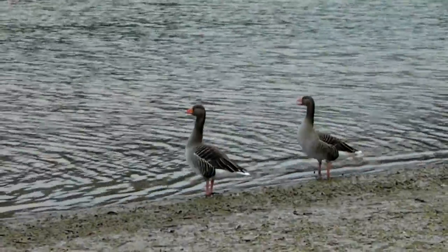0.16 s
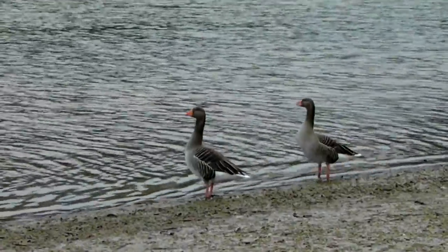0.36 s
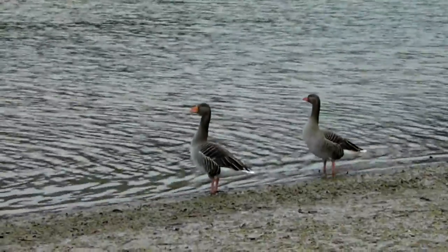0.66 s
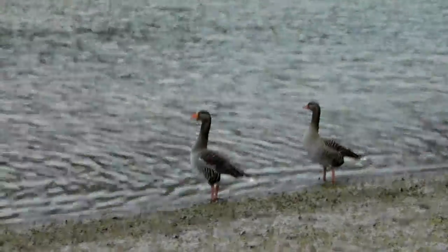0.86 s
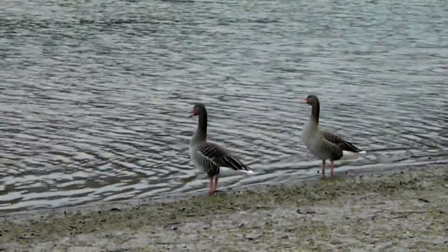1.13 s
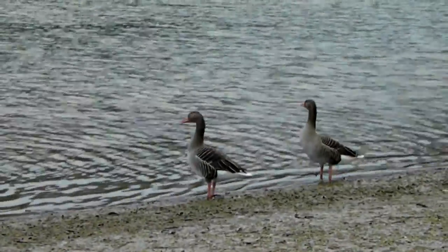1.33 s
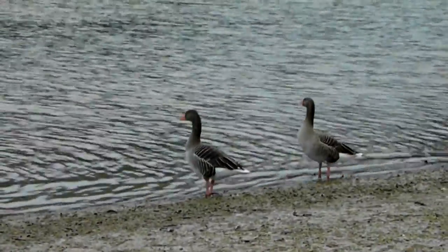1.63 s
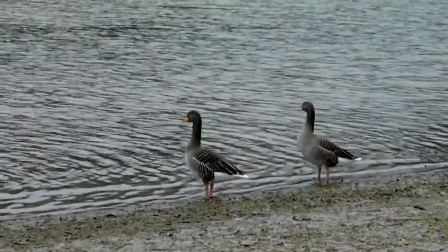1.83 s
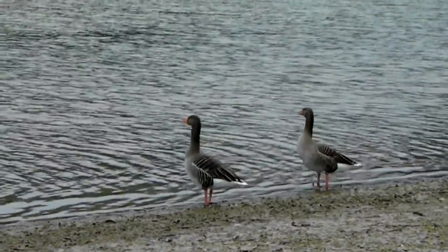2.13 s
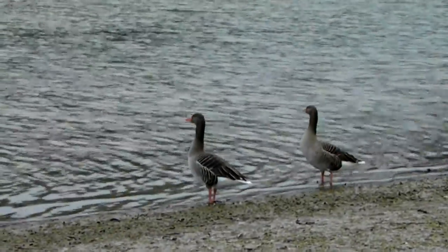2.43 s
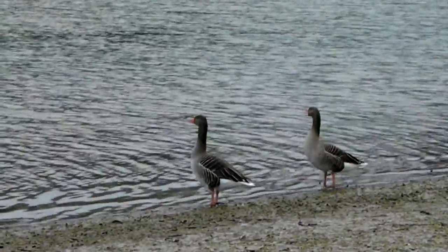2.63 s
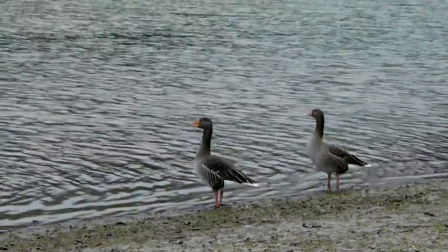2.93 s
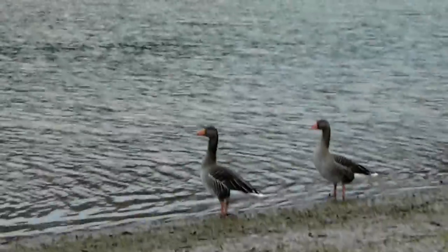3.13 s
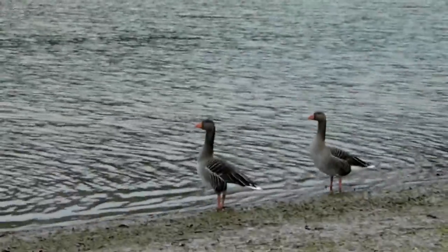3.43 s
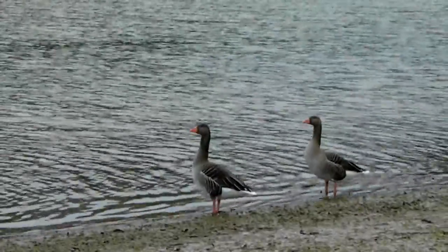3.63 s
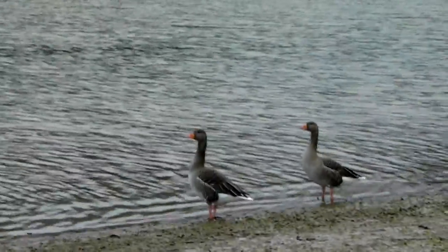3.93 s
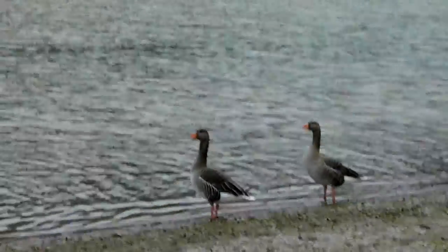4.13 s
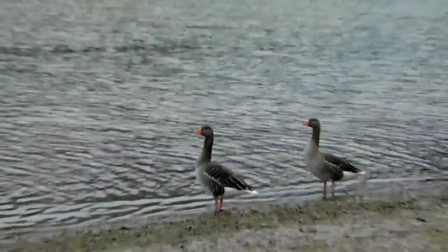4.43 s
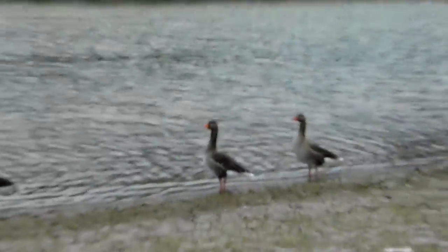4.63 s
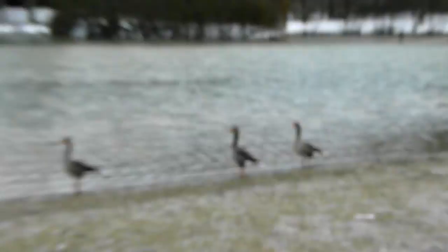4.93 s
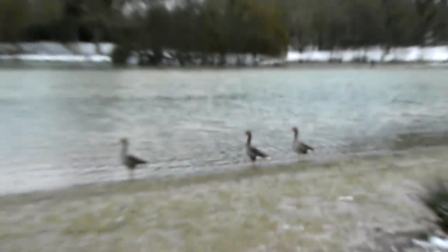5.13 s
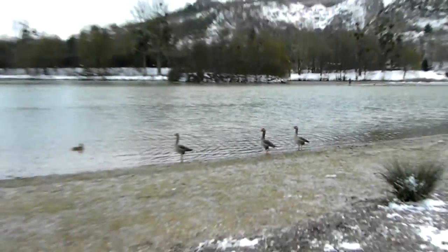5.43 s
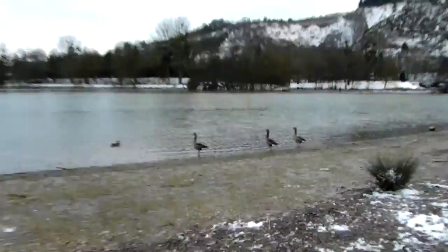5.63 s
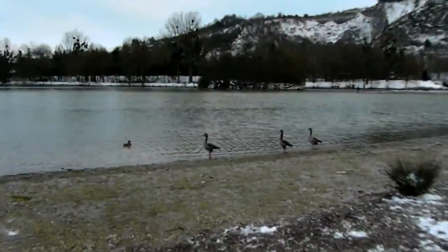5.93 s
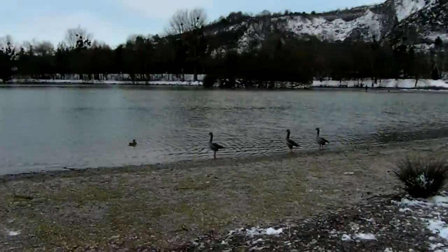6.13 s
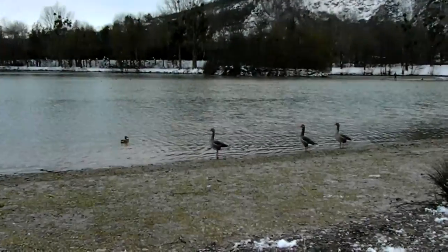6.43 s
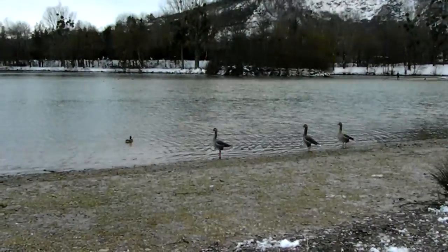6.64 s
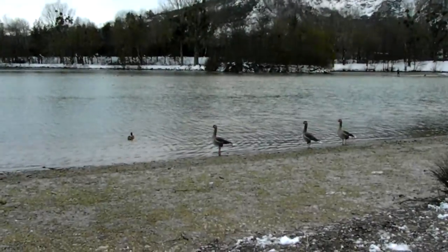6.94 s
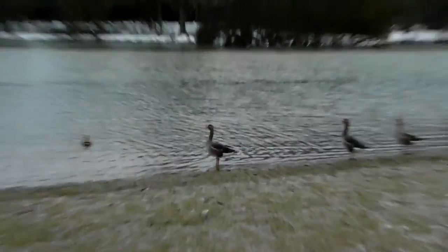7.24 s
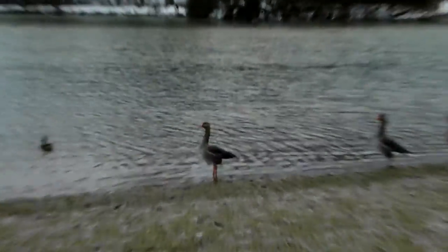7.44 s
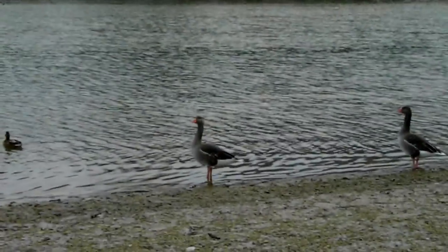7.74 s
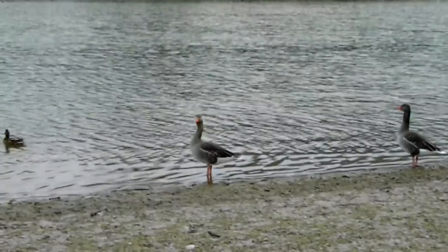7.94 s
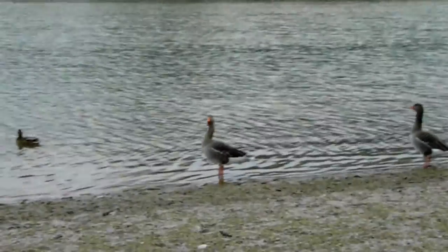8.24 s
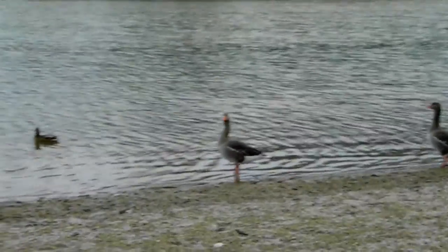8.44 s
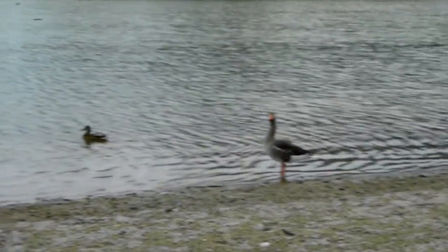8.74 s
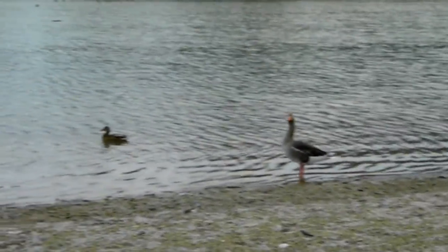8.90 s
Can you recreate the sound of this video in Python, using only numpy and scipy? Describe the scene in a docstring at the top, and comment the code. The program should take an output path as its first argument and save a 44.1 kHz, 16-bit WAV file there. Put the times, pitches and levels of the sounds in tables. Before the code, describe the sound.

Over the soft, steady wash of lake ripples, nearby geese give short, ringing honks with rough edges, mixed at first with rattling grunts. A cluster of sharp clicks comes early and others are scattered throughout. Midway the honks come in a quick run as the camera's zoom motor starts to hiss in spurts close to the microphone. Faint far bird calls and two gull cries follow, then more honks and small lens ticks.

```python
"""Greylag geese honk close by on a lake shore while ripples wash the bank.
A goose's voice box (the syrinx) sings through its throat: each honk starts with a rasp, clears into
a ringing tone and frays again. In between, slower slaps of the voice box make low rattling grunts.
Sharp clicks sound nearby, far birds and a gull call, and the lens motor of a hand-held camera
whirrs, hisses and ticks as it focuses and zooms."""
import sys
import numpy as np
from scipy import signal
from scipy.fft import rfft, irfft
from scipy.io import wavfile
from scipy.ndimage import uniform_filter1d, minimum_filter1d, map_coordinates

SR = 44100
rng = np.random.default_rng(int(sys.argv[2]) if len(sys.argv) > 2 else 0)


def inscribe(sig):
    """Save sig as 16-bit PCM at rate SR to the path in sys.argv[1].

    A 1-D sig is mono; a 2-D sig holds one channel per row.
    Samples are clipped to [-1, 1] before scaling.
    """
    pcm = np.round(np.clip(np.atleast_2d(sig).T, -1, 1) * 32767)
    wavfile.write(sys.argv[1], SR, pcm.astype(np.int16))


N = 399987
TIME = np.arange(N) / SR

# One row a honk. Clear, crest, crack and fray count from its start; a crack of 0 means none.
# (start [s], tone clears [s], pitch crests [s], voice cracks [s], tone frays [s], length [s],
#  crest pitch [Hz], sag [share of crest pitch per s], level [dB], fade by the end [dB],
#  overtones at 4-6.5 kHz [dB relative to level], sheen above them [dB relative to level],
#  flutter [Hz], roughness left in the clear tone [0-1], upper throat resonance [dB])
HONKS = [(-0.1, 0.02, 0.038, 0.0, 0.11, 0.13, 860.0, 1.8, -22.0, 18.0, -7.0, -26.0, 190.0, 0.38, -3.0),
         (0.245, 0.037, 0.051, 0.076, 0.13, 0.19, 888.0, 1.97, -12.2, 26.0, -13.0, -27.0, 180.0, 0.27, -8.0),
         (0.611, 0.022, 0.039, 0.0, 0.089, 0.14, 859.0, 1.73, -12.9, 20.0, -8.0, -27.0, 170.0, 0.069, -1.0),
         (1.063, 0.019, 0.054, 0.082, 0.134, 0.19, 881.0, 1.93, -11.7, 25.0, -13.0, -26.0, 190.0, 0.021, -2.0),
         (1.224, 0.036, 0.054, 0.0, 0.122, 0.146, 601.0, 1.1, -18.0, 17.0, -10.5, -21.0, 290.0, 0.1, -10.0),
         (1.773, 0.018, 0.035, 0.075, 0.047, 0.11, 890.0, 1.3, -16.5, 8.0, -8.0, -20.0, 250.0, 0.35, -4.0),
         (1.85, 0.032, 0.046, 0.0, 0.092, 0.15, 840.0, 1.5, -18.9, 18.0, -4.0, -24.0, 190.0, 0.08, -4.0),
         (2.625, 0.029, 0.05, 0.081, 0.124, 0.17, 888.0, 2.18, -14.3, 22.0, -11.0, -26.0, 170.0, 0.036, -7.0),
         (2.91, 0.022, 0.053, 0.0, 0.098, 0.12, 861.0, 2.24, -13.9, 10.0, -12.0, -29.0, 180.0, 0.11, 0.0),
         (4.058, 0.028, 0.055, 0.071, 0.122, 0.17, 889.0, 2.47, -11.5, 18.0, -10.0, -20.0, 180.0, 0.09, -7.0),
         (4.677, 0.026, 0.046, 0.0, 0.08, 0.11, 846.0, 3.08, -14.4, 19.0, -10.0, -27.0, 190.0, 0.05, -2.0),
         (4.905, 0.015, 0.072, 0.069, 0.064, 0.18, 914.0, 2.45, -13.5, 14.0, -8.0, -17.0, 170.0, 0.18, -5.0),
         (5.198, 0.03, 0.073, 0.0, 0.129, 0.16, 889.0, 2, -12.6, 16.0, -7.0, -26.0, 180.0, 0.033, -6.0),
         (5.55, 0.025, 0.057, 0.085, 0.145, 0.2, 891.0, 1.78, -10.0, 21.0, -13.0, -22.0, 200.0, 0.024, -6.0),
         (6.719, 0.025, 0.053, 0.068, 0.11, 0.16, 882.0, 2.7, -11.3, 22.0, -14.0, -29.0, 195.0, 0.03, -11.0),
         (6.965, 0.028, 0.069, 0.0, 0.12, 0.14, 876.0, 2.33, -13.4, 10.0, -10.0, -31.0, 190.0, 0.028, -5.0),
         (7.276, 0.016, 0.062, 0.082, 0.141, 0.19, 904.0, 2.1, -12.7, 14.0, -13.0, -13.0, 180.0, 0.2, -4.0),
         (7.558, 0.026, 0.057, 0.0, 0.129, 0.15, 609.0, 1.1, -13.4, 21.0, -4.0, -15.0, 200.0, 0.06, -7.0),
         (8.588, 0.033, 0.049, 0.07, 0.117, 0.17, 886.0, 2.44, -11.6, 21.0, -15.0, -26.0, 185.0, 0.075, -10.0),
         (8.808, 0.04, 0.073, 0.0, 0.137, 0.18, 874.0, 1.84, -15.2, 19.0, -10.0, -34.0, 190.0, 0.03, -9.0)]
# The tone colours of a honk, each (frequency [Hz], level [dB]):
OPEN_THROAT = [(600, -20.5), (850, -16.5), (1200, -17.5), (1750, -15.5), (2400, -1), (2650, 0),
               (3000, -16.5), (3400, 0.5), (3700, -5.5)]  # with the bill open
LOCKED_THROAT = [(850, -17), (1750, -18.5), (2600, -22), (3100, -11.5), (3500, 0.5), (3700, -3)]  # while the voice locks on the upper resonance
OVERTONE_COLOUR = [(3950, -12), (4200, -1.5), (4400, 0.5), (5300, -2), (6100, -23), (7050, -12),
                   (7800, -17.5), (8700, -14), (9800, -32), (11500, -45), (16000, -53)]  # the high harmonics
RASP_COLOUR = [(300, -32.5), (700, -12), (1100, -2.5), (1400, -26.5), (2100, 6.5), (2550, -4.5),
               (3000, -20.5), (3500, 1), (4000, -15), (4800, -0.5), (6200, -19.5), (8800, -22.5),
               (10800, -39.5), (15000, -47.5)]  # the breathy noise
# Lapping water and the low rumble under it, each (frequency [Hz], level [dB])
RIPPLE_COLOUR = [(140, -51.5), (230, -18), (280, -12.5), (520, -5.5), (621, -4.5), (886, -2), (986, -3),
                 (1560, -6), (2810, -13.5), (3940, -10), (4870, -20.5), (5710, -27.5), (6820, -30.5),
                 (16000, -37)]
RUMBLE_COLOUR = [(20, -26), (38, -16), (60, 1), (80, -7.5), (125, -7), (160, -13), (200, -22.5), (400, -48)]
# Nearby clicks and knocks: (time [s], level [dB], extra thud under 800 Hz [dB],
#  extra body under 2.5 kHz [dB], extra treble over 6 kHz [dB])
CLICKS = [(0.205, -31, 0, -5, -15), (2.565, -14.5, -4, -10, -2), (2.583, -17, -4, -11, -1),
          (2.592, -15.5, -4, -15, -3), (2.601, -21.5, -4, -5, -4), (2.757, -26, -4, -5, -1),
          (3.2, -37.5, 0, -1, -14), (3.215, -33, 0, -12, -10), (3.554, -28.5, -4, 6, -6),
          (3.963, -27, 3, 4, 2), (4.375, -29, 0, -5, -8), (4.467, -22, 5, 1, -9), (4.478, -20, 7.5, 5, -13),
          (5.955, -24, 6, 0, -10), (5.999, -25, 0, -8, -2), (6.568, -22, -2, 2.5, 9),
          (6.71, -30, 0, -5, -2), (7.559, -18, 0, -2, 17), (8.453, -29, 0, -8, -9),
          (8.46, -29.5, 0, -10, -3), (8.497, -36, 0, -8, -3)]
CLICK_COLOUR = [(150, -27.5), (280, -2.5), (600, -4), (1300, 5.5), (2500, 2), (3500, 3.5), (5500, -3),
                (9000, -18), (15000, -31)]  # a hard contact: (frequency [Hz], level [dB])
# Notes from the voice box's other side: (start [s], end [s], pitch [Hz], level [dB], flutter [Hz])
SECOND_VOICE = [(.25, .33, 1016, -29.5, 195), (1.78, 1.83, 1022, -27, 200), (1.81, 1.925, 1156, -23.5, 273),
                (4.962, 5.04, 1102, -24.5, 174), (7.31, 7.395, 1040, -36, 202)]
SECOND_THROAT = [(1100, -9.5), (2200, 0), (3300, -18.5), (4500, -8), (5600, -17)]  # their tone colour: (frequency [Hz], level [dB])
# Rattling grunts: (start [s], length [s], level [dB], depth of the swell [dB])
GRUNTS = [(.742, .128, -21, 11.5), (1.364, .19, -18, 17), (2.118, .18, -16.5, 22), (2.963, .108, -20, 1.5),
          (3.606, .165, -17, 18)]
GRUNT_THROAT = [(200, -44), (340, -25.5), (480, -33), (1000, -23), (1500, -12), (1900, 0), (2350, -8),
                (3000, -27), (4250, -17), (5000, -31), (6200, -34.5), (7100, -30.5), (9000, -43),
                (12000, -60), (16000, -68)]  # the throat once open: (frequency [Hz], level [dB])
# Thin calls of far birds: (start [s], end [s], top pitch [Hz], level [dB])
FAR_CALLS = [(2.043, 2.105, 3780, -65), (2.296, 2.417, 3800, -62), (7.027, 7.172, 1154, -41),
             (7.2, 7.33, 1160, -40.5), (7.379, 7.507, 1125, -42.5), (7.498, 7.6, 1134, -43)]
# How loud the focus motor is over time: (time [s], level [dB])
FOCUS_LEVELS = [(3.25, -78), (3.5, -47.5), (3.74, -44), (3.8, -57.5), (7.6, -62.5), (7.7, -45.5),
                (7.95, -46.5), (8.1, -53), (8.16, -61)]
FOCUS_COLOUR = [(1000, -16), (2400, -10.5), (3500, 5.5), (4400, -4.5), (5500, 4.5), (7000, -12.5),
                (9500, -16.5), (15000, -34.5)]  # its whirr: (frequency [Hz], level [dB])
# Short jerks of the lens motor: (time [s], level [dB], ringing pitch [Hz])
JERKS = [(4.4134, -24, 3080), (5.9229, -24, 3044), (8.2246, -27, 3470), (8.3245, -24, 3520),
         (8.4252, -25, 3750), (8.7922, -30.5, 3340), (8.9967, -28.5, 3600)]
# Runs of the zoom motor: (start [s], end [s], level [dB])
ZOOMS = [(4.42, 4.5, -42), (4.49, 5.2, -36), (5.18, 5.785, -38), (5.915, 6.072, -36), (6.265, 6.44, -37),
         (6.98, 7.7, -35.5)]
ZOOM_COLOUR = [(280, -34), (500, -14), (1400, -16.5), (1700, -6.5), (2400, -5.5), (3020, 2.5), (3550, -4.5),
               (4300, -13.5), (6300, -8.5), (7500, -22), (8600, -20), (9800, -32.5), (13800, -34),
               (14900, -34), (16000, -47)]  # its hiss: (frequency [Hz], level [dB])
# Cries of a far gull: (start [s], end [s], pitch [Hz], level [dB], flutter [Hz])
GULL_CRIES = [(6.095, 6.18, 1175, -40, 140), (6.197, 6.29, 1185, -39.5, 135)]
GULL_THROAT = [(1150, -24), (2350, -8), (3500, 0), (4600, -3), (5800, -24)]  # their tone colour: (frequency [Hz], level [dB])
# The lens motor creeping step by step: (start [s], end [s], rate [steps per s], level [dB])
CREEPS = [(6.43, 6.65, 90, -42)]
LENS_RING = [(1500, -22), (2800, -6), (3150, -20), (3600, 9.5), (4000, -3), (4400, -3), (5100, -16),
             (6000, -31), (15000, -49)]  # how the lens rings at each step: (frequency [Hz], level [dB])


def gain_of(db):
    """Turns decibels into a number to multiply by."""
    return 10 ** (np.asarray(db) / 20)


def evened(x):
    """Scales a sound to an average strength (rms) of 1."""
    return x / np.sqrt(np.mean(x ** 2) + 1e-20)


def level_at(points, hz):
    """Looks up a tone colour's level in dB at any frequency."""
    f, db = np.transpose(points)
    return np.interp(np.log(hz + 1), np.log(f + 1), db)


def add(mix, start, sound):
    """Mixes a sound in at a start time in seconds."""
    at = round(start * SR)
    part = mix[max(at, 0):][:len(sound) + min(at, 0)]
    part += sound[max(-at, 0):][:len(part)]


def ramp(x, width):
    """A soft step from 0 to 1 where x passes zero."""
    return .5 + .5 * np.tanh(x / width)


def wander(t, hz):
    """A smooth random wobble, about 1 in size, with hz new values a second."""
    steps = (t - t[0]) * hz + 2
    return map_coordinates(rng.standard_normal(int(steps[-1]) + 5), [steps], order=3)


def colour(x, points, size=4096):
    """Gives x a tone colour, like a body that rings after it is struck."""
    cepstrum = irfft(np.log(gain_of(level_at(points, np.fft.rfftfreq(size, 1 / SR)))))
    # move all the ringing to after the strike
    cepstrum[1:size // 2] *= 2
    cepstrum[size // 2 + 1:] = 0
    return signal.oaconvolve(x, irfft(np.exp(rfft(cepstrum))))[:len(x)]


def noise(points, count=N):
    """Noise of strength 1 with the given tone colour."""
    return evened(colour(rng.standard_normal(count), points))


def phase_of(hz):
    """The running angle of a wave whose pitch changes."""
    return 2 * np.pi * np.cumsum(hz) / SR


def beats(rate):
    """Sample numbers at which a rate in Hz completes a cycle."""
    return np.flatnonzero(np.diff(np.floor(np.cumsum(rate) / SR)))


def puffs(hits, decay_s):
    """Follows each hit with a dying puff of noise."""
    return signal.lfilter([1], [1, -np.exp(-1 / (decay_s * SR))], hits) * rng.standard_normal(len(hits))


def breath(t, clear, crest, crack, length, crest_hz, sag_per_s, peak_db, fade_db, climb_per_s=1.9):
    """One breath drives a honk: gives its pitch, level, and dB shifts of overtones and sheen."""
    has_crack = float(crack > 0)
    # the pitch climbs to a rounded crest and sags; soon after a crack it rests on a shelf
    from_crest = np.hypot(t - crest, .023) - .023
    shelf = has_crack * .041 * ramp(t - crack - .0278, .013)
    hz = crest_hz * (1 - np.where(t < crest, climb_per_s, sag_per_s) * from_crest + shelf)
    # the breath swells until just after the tone clears, runs out ever faster, and stops
    opening = np.maximum(1 - t / (clear + .0092), 0) ** 1.49
    spent = (t / length) ** 2.7
    stopping = np.exp((t - length) / .0067)
    # a crack dents the level, flashes the overtones and leaves the voice weaker, then duller
    cracking = has_crack * np.exp(-((t - crack) / .009) ** 2)
    cracked = has_crack * ramp(t - crack, .006)
    dulled = has_crack * ramp(t - crack - .042, .012)
    level_db = peak_db - 17 * opening - fade_db * spent - 12.5 * stopping - 3.8 * cracking - 4 * cracked
    bright_db = 3.5 * opening + 6.5 * cracking - 5 * spent - 5 * dulled
    return hz, level_db, bright_db, -11 * spent


def honk(row, harmonics=19, rasp_db=-11, air_db=-30, chop=.6, bend=.18):
    """The voice box sings through the throat; a slower flutter chops the tone at both ends."""
    (start, clear, crest, crack, fray, length, crest_hz, sag_per_s, peak_db, fade_db,
     overtones_db, sheen_db, flutter_hz, left_rough, upper_db) = row
    t = np.arange(0, length, 1 / SR)
    hz, level_db, bright_db, shine_db = breath(
        t, clear, crest, crack, length, crest_hz, sag_per_s, peak_db, fade_db)
    rough = np.clip(left_rough + ramp(clear - t, .006) + ramp(t - fray, .003), 0, 1)
    hz = hz * (1 + (.0015 + .018 * rough) * wander(t, 600))
    # each flutter cycle opens a burst and bends the pitch
    flutter = phase_of(flutter_hz * (1 + .1 * wander(t, 150)))
    burst = 1 + chop * rough * (np.cos(flutter) + .25 * wander(t, 250))
    burst /= np.sqrt(1 + rough ** 2 / 2)
    phase = phase_of(hz) + bend * rough * np.sin(flutter)
    k = np.arange(1, harmonics + 1)[:, None]
    harmonic_hz = k * hz
    # a voice that cracks locks on the upper resonance first, then drops to the lower one
    locked = ramp(crack - t, .012) * ramp(t - .016, .006)
    upper = np.exp(-((harmonic_hz - 3500) / 400) ** 2)
    open_db = level_at(OPEN_THROAT, harmonic_hz) + upper_db * upper
    throat = gain_of(locked * level_at(LOCKED_THROAT, harmonic_hz) + (1 - locked) * open_db)
    # three bands share the power: throat, overtones and sheen
    high, top = ramp(harmonic_hz - 3920, 60), ramp(harmonic_hz - 6500, 150)
    overtones = gain_of(level_at(OVERTONE_COLOUR, harmonic_hz))
    bright = gain_of(np.minimum(overtones_db + bright_db, -2))
    bands = [(np.sqrt(1 - bright ** 2), throat * (1 - high)),
             (bright, overtones * high * (1 - top)),
             (gain_of(sheen_db + shine_db), overtones * top)]
    strengths = sum(share * band / np.linalg.norm(band, axis=0) for share, band in bands)
    # the lowest harmonic holds on as the effort fades
    strengths[0] *= gain_of(.62 * np.clip(-19 - level_db, 0, 26))
    tone = (strengths * np.cos(k * phase + 2 * np.pi * rng.random((harmonics, 1)))).sum(0)
    rasp = noise(RASP_COLOUR, len(t)) * (gain_of(air_db) + gain_of(rasp_db) * rough)
    loudness = np.sqrt(2) * gain_of(level_db) * signal.windows.tukey(len(t), .03)
    return start, loudness * burst * (tone + rasp)


def bank_echo(x, echo_db=-31, die_away_s=.62):
    """Adds the faint scatter that comes back from the bank and the trees."""
    t = np.arange(SR) / SR
    tail = rng.standard_normal(SR) * gain_of(-60 * t / die_away_s) * (t > .008)
    return x + gain_of(echo_db) * signal.oaconvolve(x, tail / np.linalg.norm(tail))[:N]


def ripples(wash_db=-46.5, lap_db=1.5, rumble_db=-65.5):
    """Ripples lap the bank over a faint low rumble."""
    wash = noise(RIPPLE_COLOUR) * gain_of(wash_db + lap_db * wander(TIME, 40))
    return wash + gain_of(rumble_db) * noise(RUMBLE_COLOUR)


def clicks(decay_s=.004):
    """Hard little contacts that die within milliseconds."""
    out, t = np.zeros(N), np.arange(2048) / SR
    hz, db = np.transpose(CLICK_COLOUR)
    for start, peak_db, thud_db, body_db, treble_db in CLICKS:
        tilt_db = (thud_db * ramp(800 - hz, 150) + body_db * ramp(2500 - hz, 400)
                   + treble_db * ramp(hz - 6000, 900))
        strike = rng.standard_normal(len(t)) * np.exp(-t / decay_s)
        tap = colour(strike, np.column_stack([hz, db + tilt_db]))
        loudest = np.sqrt(uniform_filter1d(tap ** 2, size=88).max())
        add(out, start, gain_of(peak_db) * tap / loudest)
    return out


def cries(rows, throat, chop, fall, arch, jitter, harmonics=5):
    """Short fluttering notes that arch in pitch, coloured by a throat."""
    out, k = np.zeros(N), np.arange(1, harmonics + 1)[:, None]
    for start, end, hz, db, flutter_hz in rows:
        t = np.arange(start, end, 1 / SR)
        from_middle = np.linspace(-1, 1, len(t))
        pitch = hz * (1 - arch * from_middle ** 2 - fall * from_middle + jitter * wander(t, 600))
        tone = (gain_of(level_at(throat, k * hz)) * np.cos(k * phase_of(pitch))).sum(0)
        burst = 1 + chop * np.cos(phase_of(flutter_hz * (1 + .11 * wander(t, 100))))
        add(out, start, gain_of(db) * evened(tone * burst * signal.windows.tukey(len(t), .6)))
    return out


def second_voice():
    """The other side of a goose's voice box sounds at its own pitch."""
    return cries(SECOND_VOICE, SECOND_THROAT, chop=.59, fall=-.013, arch=.0382, jitter=.017)


def grunt(start, length, peak_db, swell_db, slap_hz=172, weak_db=-6, rebound_db=-11, air_db=-14):
    """Slaps of the voice box, strong and weak in turn, each with a small rebound, ring the throat."""
    t = np.arange(0, length, 1 / SR)
    shut = np.maximum(1 - t / (.71 * length), 0)  # falls to 0 as the bill opens
    db = peak_db - swell_db * shut - 21.5 * np.exp((t - length) / .0095)  # swells, then is cut short
    at = beats(2 * slap_hz * (1 + .07 * wander(t, 200)))
    pattern_db = np.resize([0, rebound_db, weak_db, rebound_db], len(at))
    slaps = np.zeros(len(t))
    slaps[at] = gain_of(pattern_db + 2 * rng.standard_normal(len(at)))
    drive = evened(slaps) + .5 * evened(puffs(slaps, decay_s=.002))
    drive += gain_of(air_db) * rng.standard_normal(len(t))
    # the whole rattle starts 16% low and glides up as the bill opens
    rattle = map_coordinates(colour(drive, GRUNT_THROAT), [np.cumsum(1 - .16 * shut)], order=3)
    return start, gain_of(db) * evened(rattle) * signal.windows.tukey(len(t), .04)


def lone_slap(start=1.2045, db=-3.5):
    """One slap of the voice box rings the throat between two honks."""
    slap = colour(signal.unit_impulse(1024), GRUNT_THROAT)
    return start, gain_of(db) * slap / abs(slap).max()


def far_birds(bend=.072, waver=.02):
    """Thin arched notes from across the water."""
    out = np.zeros(N)
    for start, end, hz, db in FAR_CALLS:
        t = np.arange(start, end, 1 / SR)
        arch = np.sin(np.linspace(0, np.pi, len(t)))
        pitch = hz * (1 + bend * (arch - 1) + waver * wander(t, 206))
        add(out, start, gain_of(db) * evened(arch * np.sin(phase_of(pitch))))
    return out


def focus_whirr():
    """The focus motor whirrs softly, swelling and fading."""
    return gain_of(np.interp(TIME, *np.transpose(FOCUS_LEVELS))) * noise(FOCUS_COLOUR)


def lens_jerks(decay_s=.0077, scrape_db=-9):
    """The lens drive rings and scrapes briefly when it jerks."""
    out, t = np.zeros(N), np.arange(2048) / SR
    for start, db, hz in JERKS:
        phase = 2 * np.pi * hz * t
        ring = evened(wander(t, 540) * np.cos(phase) + wander(t, 550) * np.sin(phase))
        scrape = gain_of(scrape_db) * noise(CLICK_COLOUR, len(t))
        stroke = ramp(t - .001, .00067) * np.exp(-(t / decay_s) ** 2 / 2)
        add(out, start, gain_of(db) * stroke * (ring + scrape))
    return out


def zoom_hiss(flicker_db=.9):
    """The zoom motor hisses while it runs at speed."""
    runs = sum(gain_of(db) * ramp(TIME - start, .0047) * ramp(end - TIME, .01)
               for start, end, db in ZOOMS)
    return runs * noise(ZOOM_COLOUR) * gain_of(flicker_db * wander(TIME, 300))


def gull():
    """A far gull cries; a deep flutter makes it hoarse."""
    return cries(GULL_CRIES, GULL_THROAT, chop=.8, fall=.05, arch=.14, jitter=.032)


def lens_creep():
    """The motor creeps in small steps that make the lens buzz."""
    out = np.zeros(N)
    for start, end, rate, db in CREEPS:
        steps = np.zeros(round((end - start) * SR))
        steps[beats(np.full(len(steps), rate))] = 1
        buzz = evened(colour(puffs(steps, decay_s=.0018), LENS_RING))
        add(out, start, gain_of(db) * buzz * signal.windows.tukey(len(steps), .5))
    return out


def limit(x, ceiling=.47, size=90):
    """A fast limiter holds the loudest peaks down."""
    allowed = ceiling / np.maximum(abs(x), ceiling)
    return x * uniform_filter1d(minimum_filter1d(allowed, size), size)


def scene():
    """Mixes geese, lake and camera into one channel; only the geese echo."""
    geese = np.zeros(N)
    for row in HONKS:
        add(geese, *honk(row))
    for row in GRUNTS:
        add(geese, *grunt(*row))
    add(geese, *lone_slap())
    geese = bank_echo(geese + second_voice())
    nearby = clicks() + zoom_hiss() + focus_whirr() + lens_creep() + lens_jerks()
    return (geese + nearby + gull() + far_birds() + ripples())[None]


def record(dry, notches_hz=((7860, 500), (185, 40)), top_hz=15950):
    """The camera cuts out two narrow bands, limits the peaks and drops the highest treble."""
    heard = dry
    for centre, width in notches_hz:
        heard = signal.lfilter(*signal.iirnotch(centre, centre / width, SR), heard)
    treble_cut = signal.firwin(511, top_hz, window=("kaiser", 9), fs=SR)
    return signal.oaconvolve(limit(heard), treble_cut[None], "same")


dry = scene()
out = record(dry)
inscribe(out)
```